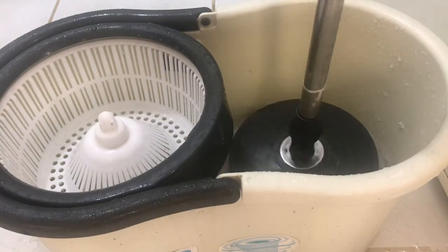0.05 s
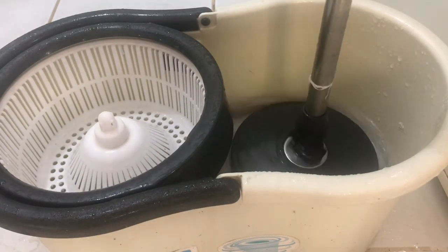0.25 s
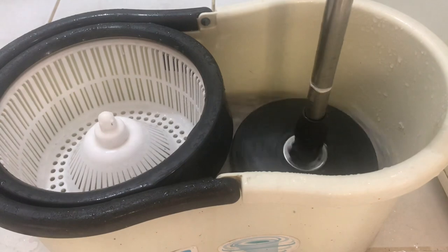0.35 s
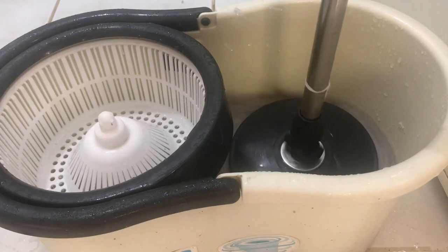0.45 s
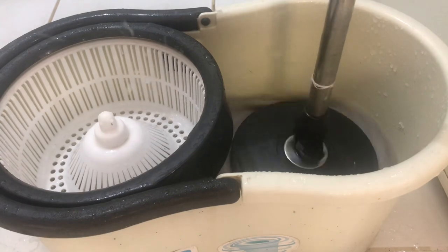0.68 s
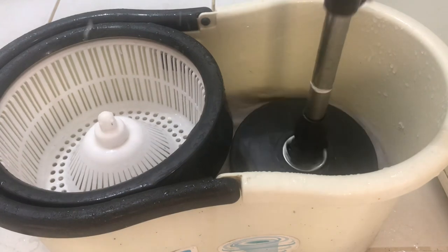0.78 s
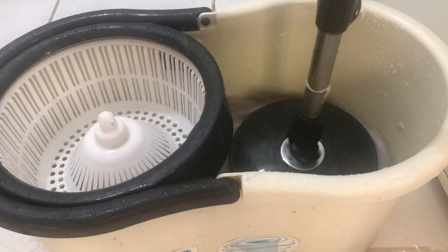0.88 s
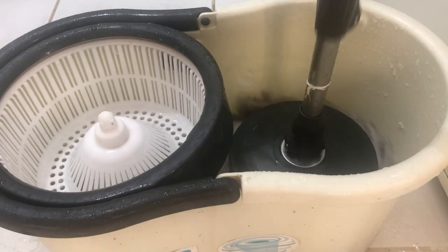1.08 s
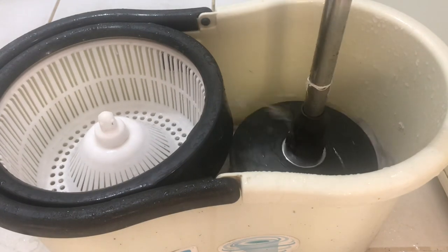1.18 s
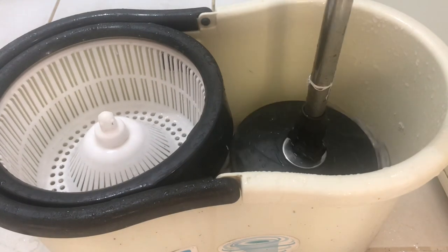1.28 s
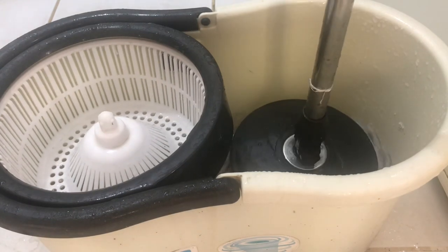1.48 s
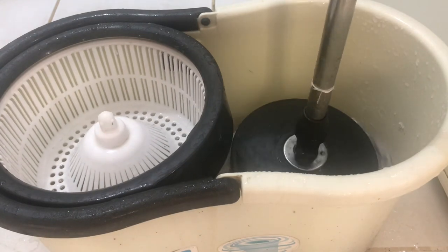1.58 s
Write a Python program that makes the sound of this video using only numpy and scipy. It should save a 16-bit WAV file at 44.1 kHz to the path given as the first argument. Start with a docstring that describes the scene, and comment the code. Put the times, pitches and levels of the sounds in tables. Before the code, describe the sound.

A spin mop whirls in a plastic bucket, spraying and sloshing water while its handle chatters. The handle hits bottom with a dull thump, then the spin fades with light clicks. Heard close in a small hard room.

```python
"""A spin mop is pushed down in a plastic bucket, close by in a small hard room. The wet head swishes round,
throwing spray and sloshing water, while the handle's screw drive chatters, rings the tube and knocks the
tub. The handle bottoms out with a dull thump and the bucket rings on with a low hum. As the spin dies
away, the loose shaft clicks and the head bumps the bucket wall."""
import sys
import numpy as np
from scipy import signal
from scipy.fft import rfft, irfft
from scipy.io import wavfile
from scipy.ndimage import uniform_filter1d, map_coordinates

SR = 44100
rng = np.random.default_rng(int(sys.argv[2]) if len(sys.argv) > 2 else 0)


def wav_out(sig):
    """Save sig, one row per channel (or a flat mono array), as 16-bit PCM at SR to the path in sys.argv[1]."""
    wavfile.write(sys.argv[1], SR, np.round(np.clip(np.atleast_2d(sig).T, -1, 1) * 32767).astype(np.int16))


N = 72765
TOP_HZ = 15850
HIT_TIME_S = np.arange(SR // 10) / SR


def amp(db):
    """Decibels to gain."""
    return 10 ** (np.asarray(db) / 20)


def unit(x):
    """Scale to rms 1."""
    return x / np.sqrt(np.mean(x ** 2) + 1e-20)


def since(start_s):
    """Seconds after start_s, zero before."""
    return np.maximum(np.arange(N) / SR - start_s, 0)


def add(out, start_s, x):
    """Mix x into out at start_s."""
    part = out[max(round(start_s * SR), 0):][:len(x)]
    part += x[:len(part)]


def coloured(x, spectrum):
    """Minimum-phase filter from (frequency [Hz], gain [dB]) points."""
    size = 8192
    hz, db = np.transpose(spectrum)
    bin_db = np.interp(np.log(np.fft.rfftfreq(size, 1 / SR) + 1), np.log(hz), db)
    cepstrum = irfft(np.log(amp(bin_db)))
    cepstrum[1:size // 2] *= 2
    cepstrum[size // 2 + 1:] = 0
    return signal.fftconvolve(x, irfft(np.exp(rfft(cepstrum))))[:len(x)]


def noise(samples, spectrum):
    """Coloured noise, rms 1."""
    return unit(coloured(rng.standard_normal(samples), spectrum))


def wobble(knots_per_s):
    """Smooth random curve."""
    return map_coordinates(rng.standard_normal(N // 100), [np.arange(N) * knots_per_s / SR], mode="mirror")


def grains(per_s, spread_db, share):
    """Tiny random impacts over white noise; share is their part of the power."""
    size = amp(spread_db * np.minimum(rng.exponential(size=N), np.pi))
    ticks = (rng.random(N) < per_s / SR) * size * rng.choice([-1, 1], N)
    return np.sqrt(share) * unit(ticks) + np.sqrt(1 - share) * rng.standard_normal(N)


def ring(modes, t, scatter_db):
    """Damped modes, t seconds after a blow."""
    return sum(amp(db + scatter_db * rng.normal() - 60 * t / t60) * np.sin(2 * np.pi * hz * t) * (-1) ** k
               for k, (hz, db, t60) in enumerate(modes))


def dappled(x, depth_db):
    """Random gain patches in time and frequency; rms 1."""
    bins = signal.stft(x, nperseg=256)[2]
    patches = uniform_filter1d(rng.standard_normal(bins.shape), size=5, axis=0)
    patches = uniform_filter1d(patches, size=4, axis=1)
    return unit(signal.istft(bins * amp(depth_db * unit(patches)))[1][:N])


def patchy(x, depth_db, knots=40):
    """Random colour for one contact, energy kept."""
    bins = rfft(x)
    hills = np.interp(np.linspace(0, knots - 1, len(bins)), np.arange(knots), rng.standard_normal(knots))
    tinted = irfft(bins * amp(depth_db * hills), len(x))
    return tinted * np.linalg.norm(x) / np.linalg.norm(tinted)


def bubbles(per_s=410, median_hz=2970, log_spread=0.42, t60_cycles=72):
    """Small bubbles, each a damped tone of its own pitch; rms 1."""
    onset, u, v, size = rng.random((int(per_s * N / SR), 4)).T[:, :, None]
    gaussian = np.sqrt(-2 * np.log(u)) * np.cos(2 * np.pi * v)
    hz = np.minimum(median_hz * np.exp(log_spread * gaussian), TOP_HZ)
    age = np.arange(SR // 25)
    cycles = hz * age / SR
    envelope = size ** 2 * amp(-60 * cycles / t60_cycles) * (1 - np.exp(-cycles / 2))
    tones = envelope * np.sin(2 * np.pi * cycles)
    positions = (onset * N).astype(int) + age
    return unit(np.bincount(positions.ravel(), tones.ravel(), N)[:N])


# Spray spectrum (frequency [Hz], gain [dB])
SPRAY_SPECTRUM = [(1200, -20), (2400, -4.5), (3000, 1), (3750, -4), (4350, 2), (5000, -6.5), (6300, -2.5),
                  (7700, -9), (8800, -6.5), (10300, -11.5), (11500, -8), (15500, -12)]


def spray(drive_db, fizz_db_per_db=0.16, neutral_db=-45, bubble_db=-3.5):
    """Flung drops and bubbles; a faster spin throws a brighter spray."""
    drops = coloured(grains(per_s=2200, spread_db=3, share=0.52), SPRAY_SPECTRUM)
    drops = dappled(drops, depth_db=2.5)
    fizz = signal.sosfiltfilt(signal.butter(2, 7900, "high", fs=SR, output="sos"), drops)
    fizz_gain = amp(fizz_db_per_db * (drive_db - neutral_db))
    return drops + fizz * (fizz_gain - 1) + amp(bubble_db) * bubbles()


# Slosh spectrum (frequency [Hz], gain [dB])
SLOSH_SPECTRUM = [(300, -19.5), (520, -5.5), (700, -11), (900, 4.5), (1350, 2), (2000, -0.5), (2300, -5.5),
                  (3500, -8), (8000, -59)]
# Tub response (frequency [Hz], gain [dB])
TUB_SPECTRUM = [(20, -37), (45, -10), (65, -6.5), (100, 1), (170, -4.5), (192, -5), (240, 2.5), (280, 1),
                (380, -8), (440, -3), (530, -12), (700, -8.5), (1500, -31.5), (5000, -64)]
# Spin envelopes (time [s], spray [dB], slosh [dB], rumble [dB])
WHIRL_LEVELS = [(0.0, -55, -53, -44), (0.11, -54, -56, -65), (0.188, -42.5, -50.5, -50),
                (0.276, -36, -33, -38.5), (0.412, -32.5, -37, -39), (0.476, -28, -33, -35.5),
                (0.55, -30.5, -29, -33), (0.618, -32, -28.5, -36), (0.762, -31.5, -35.5, -35),
                (0.858, -32.5, -39, -28), (0.95, -30, -32, -37), (1.08, -38.5, -39.5, -40),
                (1.18, -46, -45.5, -50.5), (1.328, -47, -50.5, -55.5), (1.46, -58, -53.5, -58.5),
                (1.65, -57, -59, -56.5)]


def whirl(spray_trim_db=-1.5, rumble_trim_db=-0.5):
    """Wet strands sweep round: gritty spray, sloshing water, rumbling tub."""
    times_s, *levels = np.transpose(WHIRL_LEVELS)
    spray_db, slosh_db, rumble_db = [np.interp(since(0), times_s, level) for level in levels]
    flutter_db = 1.5 * wobble(150)
    drops = spray(spray_db) * amp(spray_db + spray_trim_db + flutter_db)
    slosh = unit(coloured(grains(per_s=900, spread_db=8.5, share=0.46), SLOSH_SPECTRUM))
    rumble = noise(N, TUB_SPECTRUM) * amp(rumble_db + rumble_trim_db)
    return drops + slosh * amp(slosh_db + flutter_db / 2 + 0.63 * wobble(60.45)) + rumble


# Room tone spectrum (frequency [Hz], gain [dB])
AIR_SPECTRUM = [(20, -39), (45, -25), (70, 11), (90, 0.5), (130, 9), (220, -13.5), (370, -4), (480, -3),
                (700, -10.5), (1500, -20.5), (4000, -22.5), (15000, -21)]


def room_tone(level_db=-48):
    """Steady low background noise."""
    return amp(level_db) * noise(N, AIR_SPECTRUM)


def rub(centre_s=0.124, half_width_s=0.062, centre_hz=960, sag_hz_per_s=513, waver_hz=14.5):
    """Faint rubbing whine that sags as the head starts to turn."""
    t = since(0) - centre_s
    hz = centre_hz - sag_hz_per_s * t + waver_hz * wobble(40)
    level_db = -49.5 + 3.5 * wobble(70)
    return amp(level_db) * np.exp(-(t / half_width_s) ** 4) * np.sin(2 * np.pi * np.cumsum(hz) / SR)


# Single drops (time [s], bubble pitch [Hz], level [dB])
DRIP_EVENTS = [(0.121, 3680, -34.5), (0.158, 3320, -35), (0.186, 3250, -25.5), (0.219, 3200, -27),
               (0.234, 2000, -23.5), (0.307, 3200, -18)]


def drips(t60_s=0.027, splash_db=-8.5):
    """Each drop makes a tiny splash and a short bubble ping."""
    out, t = np.zeros(N), HIT_TIME_S
    for start_s, hz, db in DRIP_EVENTS:
        splash = amp(splash_db) * noise(len(t), SPRAY_SPECTRUM)
        ping = (1 - np.exp(-hz * t / 2)) * np.sin(2 * np.pi * hz * t)
        add(out, start_s, amp(db - 60 * t / t60_s) * (ping + splash))
    return out


# Hollow tub swells (time [s], level [dB])
BOOM_EVENTS = [(0.212, -25.5), (0.31, -32), (0.366, -30)]


def booms(hz=252.3, rise_s=0.016, t60_s=0.14):
    """The first sweeps of the strands swell the tub's hollow resonance."""
    out = np.zeros(N)
    for start_s, db in BOOM_EVENTS:
        t = since(start_s)
        out += amp(db - 60 * t / t60_s) * (1 - np.exp(-t / rise_s)) * np.sin(2 * np.pi * hz * t)
    return out


def excite(body, contact):
    """A body's impulse response driven by noise under the contact envelope, at that envelope's energy."""
    response = signal.fftconvolve(contact * rng.standard_normal(len(contact)), body)
    return response * np.linalg.norm(contact) / np.linalg.norm(response)


# Drive rasp spectrum (frequency [Hz], gain [dB])
RASP_SPECTRUM = [(300, -20.5), (900, 2.5), (1500, -3), (2300, -6.5), (3150, -5), (4400, -4), (5200, -4),
                 (6300, 0.5), (7700, -5.5), (8900, -2), (10300, -6.5), (11500, -3), (15500, -8)]
# Handle tube modes (frequency [Hz], level [dB], t60 [s])
TUBE_MODES = [(2600, -4.5, 0.0064), (3200, 0, 0.0086), (4450, -2.5, 0.01), (6460, -11.5, 0.003)]
# Drive catches (time [s], nominal length [s], rasp [dB], tube ring [dB], knock [dB])
DRIVE_CATCHES = [(0.332, 0.0044, -21.5, -18.5, -36), (0.356, 0.0024, -26, -18, -26),
                 (0.369, 0.0022, -20.5, -16.5, -27), (0.376, 0.0082, -28.5, -31, -28),
                 (0.394, 0.0036, -31, -20.5, -38), (0.409, 0.0069, -27.5, -18.5, -36),
                 (0.418, 0.0018, -35, -14.5, -37), (0.444, 0.0049, -42, -21, -48),
                 (0.451, 0.005, -26.5, -26, -30), (0.463, 0.0037, -26, -39, -28),
                 (0.482, 0.0027, -24, -19, -28), (0.5288, 0.0033, -22, -19, -18),
                 (0.555, 0.0047, -21.5, -15, -20.5), (0.584, 0.002, -23, -14, -42),
                 (0.595, 0.0067, -24, -26, -37), (0.619, 0.0065, -25.5, -23, -22),
                 (0.649, 0.002, -24.5, -16.5, -21), (0.653, 0.0063, -21.5, -28, -26),
                 (0.6881, 0.0017, -21.5, -18.5, -17), (0.706, 0.016, -30, -23.5, -23),
                 (0.736, 0.0057, -21, -18.5, -20), (0.766, 0.005, -23, -19.5, -22),
                 (0.816, 0.0045, -27, -21, -18.5), (0.848, 0.0018, -20.5, -38, -35),
                 (0.858, 0.01, -22.5, -51, -24), (0.875, 0.0062, -25.5, -24.5, -21.5),
                 (0.912, 0.0028, -30, -22, -31), (0.923, 0.0072, -24.5, -24, -22.5),
                 (0.965, 0.0064, -24.5, -21.5, -29.5), (1.007, 0.0088, -22, -23, -27.5),
                 (1.049, 0.0036, -29.5, -21.5, -56), (1.104, 0.0054, -43, -27.5, -56),
                 (1.123, 0.0041, -34.5, -31.5, -39), (1.224, 0.017, -39.5, -38.5, -56)]


def chatter(rise_s=0.00027, rasp_t60_s=0.027, knock_t60_s=0.043, tube_trim_db=-4.5, knock_trim_db=-3):
    """Each catch of the screw drive is a short rasp of ticks that rings the tube and knocks the tub."""
    out, t = np.zeros(N), HIT_TIME_S
    ticks = unit(coloured(grains(per_s=5200, spread_db=3, share=0.5), RASP_SPECTRUM))
    tub = coloured(signal.unit_impulse(len(t)), TUB_SPECTRUM)
    rise = np.minimum(t / rise_s, 1)
    for start_s, length_s, rasp_db, tube_db, knock_db in DRIVE_CATCHES:
        scrape = rise * amp(-60 * np.maximum(t - 0.77 * length_s, 0) / rasp_t60_s)
        shove = rise * amp(-60 * np.maximum(t - length_s / 2, 0) / knock_t60_s)
        rasp = patchy(scrape * ticks[round(start_s * SR):][:len(t)], depth_db=3)
        detuned = [(hz * np.exp(0.069 * rng.normal()), db, t60) for hz, db, t60 in TUBE_MODES]
        tube = ring(detuned, t, scatter_db=3)
        add(out, start_s, amp(rasp_db) * rasp)
        add(out, start_s, amp(tube_db + tube_trim_db) * excite(tube, scrape ** 2))
        add(out, start_s, amp(knock_db + knock_trim_db) * excite(tub, shove))
    return out


# Bucket modes (frequency [Hz], level [dB], t60 [s])
BUCKET_MODES = [(100, -12, 0.07), (117, -6.5, 0.3), (246, -3, 0.16), (271.4, -3, 0.38), (332, 3, 0.13),
                (434.8, -15, 0.55), (589, -4, 0.19), (717, -11, 0.19), (934, -3, 0.13), (1000, 3, 0.029),
                (1390, -12, 0.061), (1510, -0.5, 0.076)]


def thump(start_s=0.8023, push_hz=830, push_width_s=0.00055, snap_t60_s=0.025):
    """The handle bottoms out: a blunt push with a snap, then the bucket's modes."""
    out, t = np.zeros(N), np.arange(SR // 4) / SR
    from_peak_s = t - 1.12 * push_width_s
    push = np.exp(-(from_peak_s / push_width_s) ** 2) * np.cos(2 * np.pi * push_hz * from_peak_s)
    snap = amp(-60 * t / snap_t60_s) * noise(len(t), RASP_SPECTRUM)
    bucket = ring(BUCKET_MODES, t, scatter_db=-0.5)
    add(out, start_s, amp(-7.5) * push + amp(-17) * snap + amp(-24) * bucket)
    return out


def hum(start_s=0.85, hz=71.4, level_db=-34, rise_s=0.018, t60_s=2.25):
    """The bucket's lowest mode swells after the stroke and fades slowly."""
    t = since(start_s)
    return amp(level_db - 60 * t / t60_s) * (1 - np.exp(-t / rise_s)) * np.sin(2 * np.pi * hz * t)


# Crack spectrum (frequency [Hz], gain [dB])
CRACK_SPECTRUM = [(200, -14), (900, 1), (4400, -1), (5500, -24), (9000, -20), (15000, -37)]
# Plastic clunk spectrum (frequency [Hz], gain [dB])
CLUNK_SPECTRUM = [(100, -23), (230, -20), (350, -4), (480, 0.5), (620, 6), (780, -8), (950, 0.5),
                  (1300, -9), (2500, -27), (8000, -55)]
# Shaft modes (frequency [Hz], level [dB], t60 [s])
SHAFT_MODES = [(1568, 2.5, 0.034), (2000, -7, 0.029), (3020, -12, 0.022), (3530, -8, 0.025)]
# Shaft taps (time [s], level [dB], clunk offset [dB], ring offset [dB])
CLICK_EVENTS = [(1.208, -35, 6.5, -9), (1.239, -32.5, -3, -6), (1.262, -31.5, 2, -19),
                (1.309, -30.5, -12, -16), (1.332, -24.5, -1.5, -21), (1.3358, -28, -10, -5),
                (1.438, -45.5, -7, 4.5), (1.477, -49, -6, 7)]


def clicks(crack_db=-1.5, crack_t60_s=0.02, clunk_db=-6, clunk_t60_s=0.049):
    """The loose shaft taps: a crack, a plastic clunk and a short ring."""
    out, t = np.zeros(N), HIT_TIME_S
    for start_s, db, dull_db, ring_db in CLICK_EVENTS:
        crack = noise(len(t), CRACK_SPECTRUM) * amp(crack_db - 60 * t / crack_t60_s)
        clunk = noise(len(t), CLUNK_SPECTRUM) * amp(clunk_db + dull_db - 60 * t / clunk_t60_s)
        shaft = amp(ring_db) * ring(SHAFT_MODES, t, scatter_db=-1)
        add(out, start_s, amp(db) * (crack + clunk + shaft))
    return out


# Bucket wall modes (frequency [Hz], level [dB], t60 [s])
WALL_MODES = [(353, 1, 0.074), (477, -1.5, 0.07), (643, -1.5, 0.05), (940, -4.5, 0.055), (1478, -2.5, 0.08)]
# Head against wall (time [s], level [dB])
BUMP_EVENTS = [(1.369, -41.5), (1.4937, -38), (1.532, -44)]


def bumps(rise_s=0.001):
    """The slowing head bumps softly against the hollow bucket wall."""
    out, t = np.zeros(N), HIT_TIME_S
    for start_s, db in BUMP_EVENTS:
        add(out, start_s, amp(db) * (1 - np.exp(-t / rise_s)) * ring(WALL_MODES, t, scatter_db=0.5))
    return out


def reverb(x, level_db=-12, t60_s=0.3, predelay_s=0.003):
    """Short diffuse tail of a small hard room."""
    t = np.arange(SR // 2) / SR
    tail = rng.standard_normal(len(t)) * amp(-60 * t / t60_s) * (t > predelay_s)
    return amp(level_db) * signal.fftconvolve(x, tail / np.linalg.norm(tail))[:N]


def scene():
    """Mop and bucket in the room, mono."""
    mop = rub() + whirl() + chatter() + thump() + clicks() + bumps() + booms() + drips()
    return (mop + room_tone() + reverb(mop) + hum())[None]


def record(dry):
    """Brick-wall low-pass at TOP_HZ."""
    size = 2 * N
    passband = np.fft.rfftfreq(size, 1 / SR) < TOP_HZ
    return irfft(rfft(dry, size) * passband, size)[:, :N]


dry = scene()
out = record(dry)
wav_out(out)
```